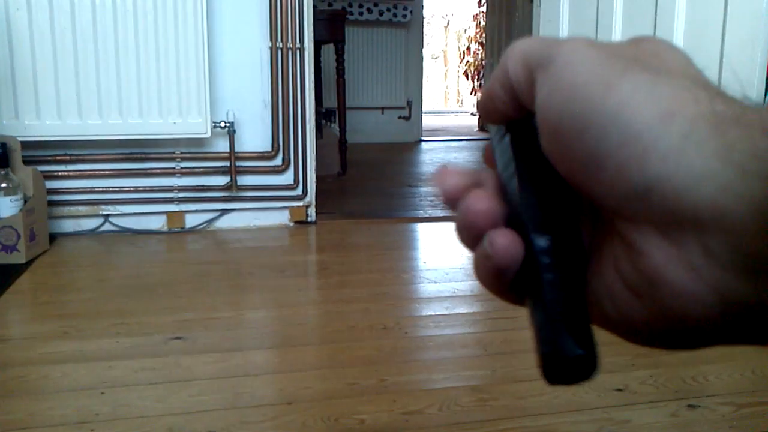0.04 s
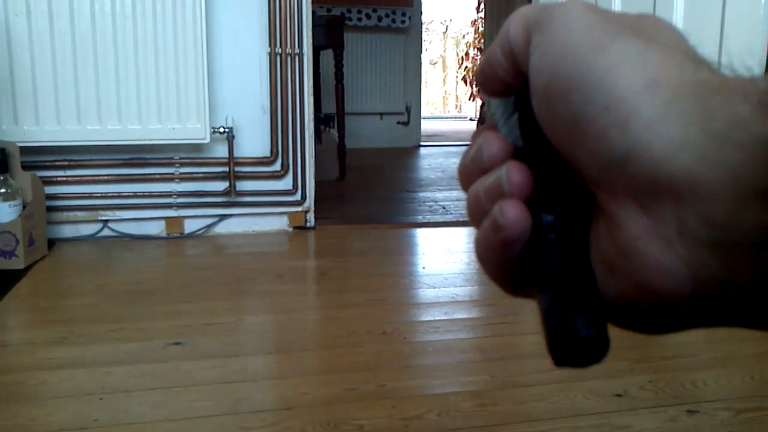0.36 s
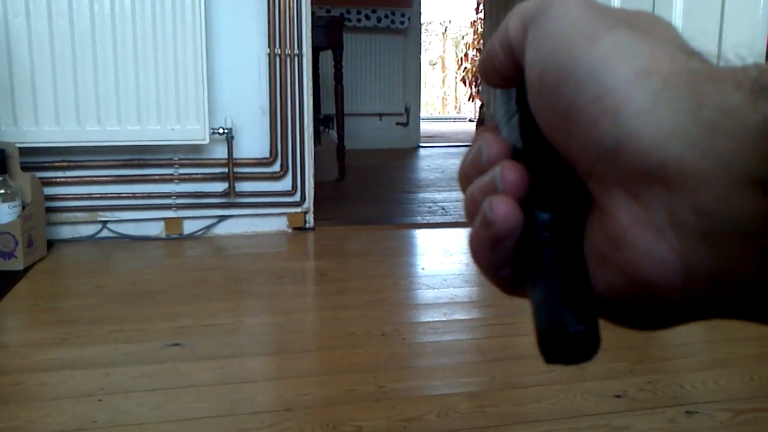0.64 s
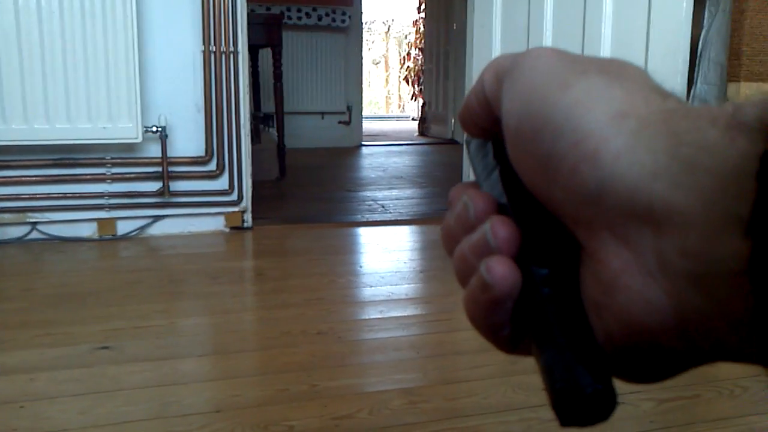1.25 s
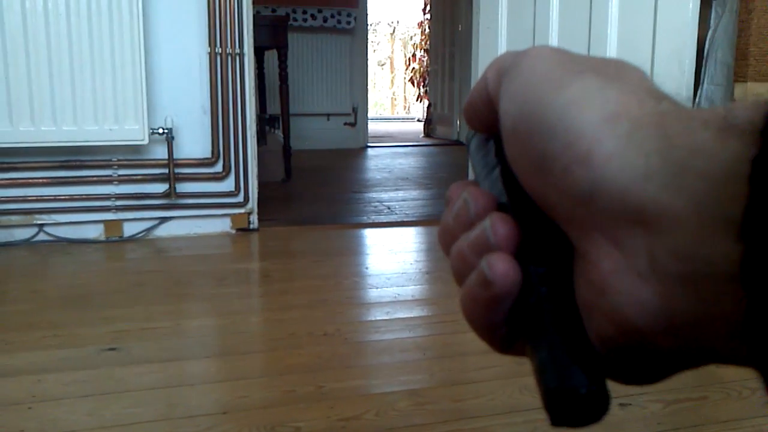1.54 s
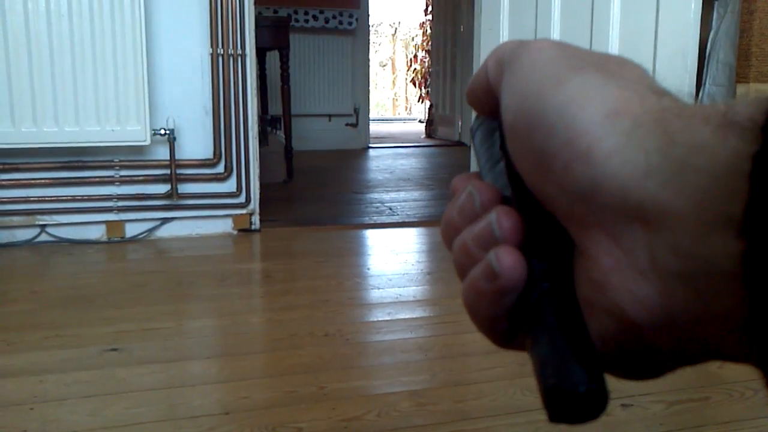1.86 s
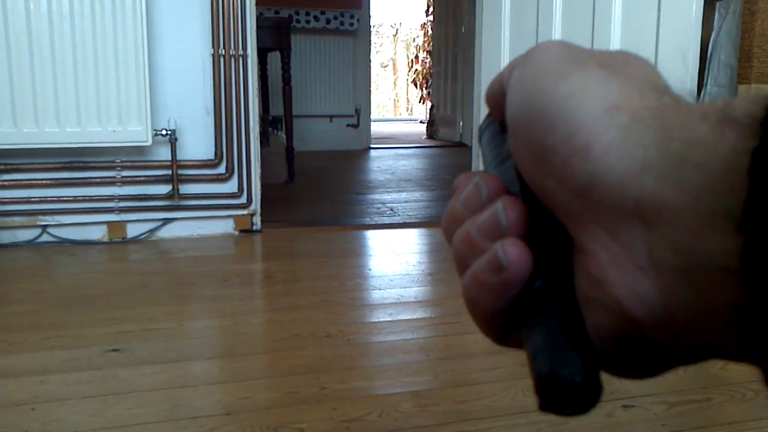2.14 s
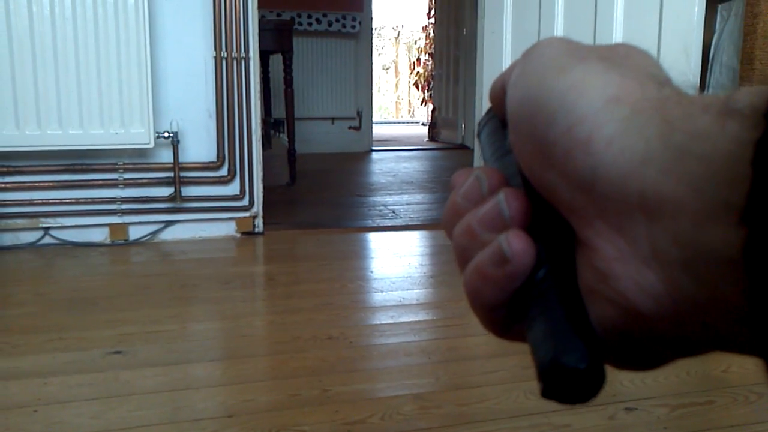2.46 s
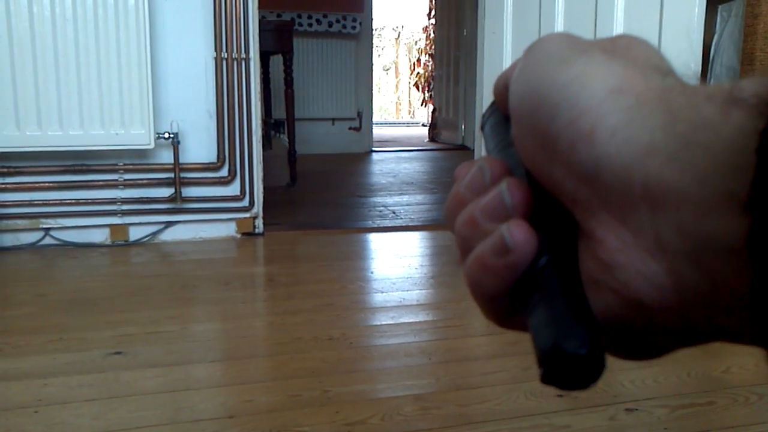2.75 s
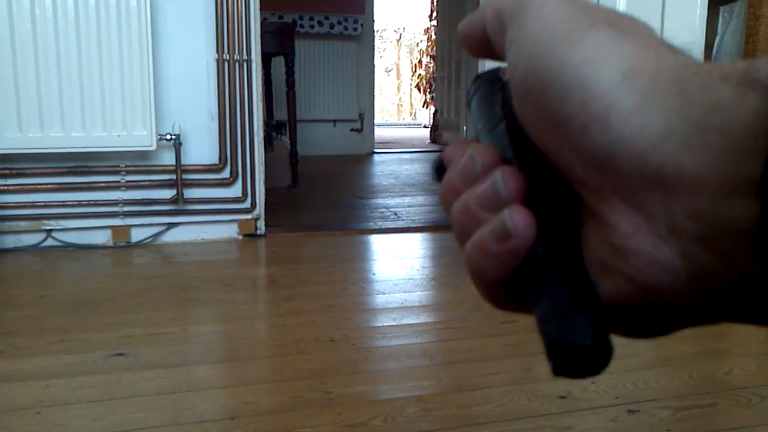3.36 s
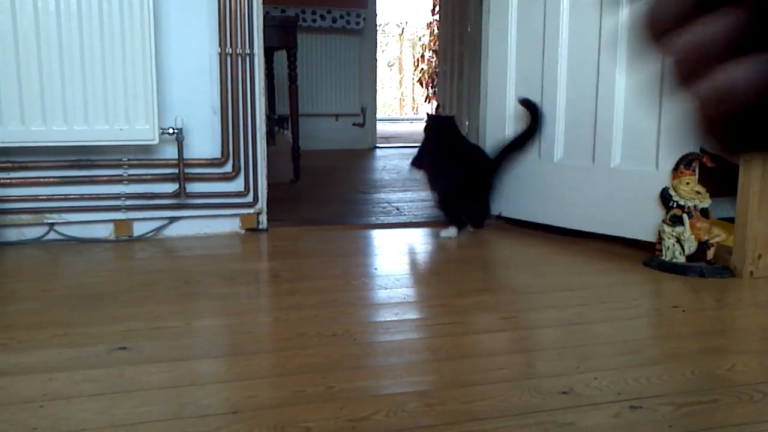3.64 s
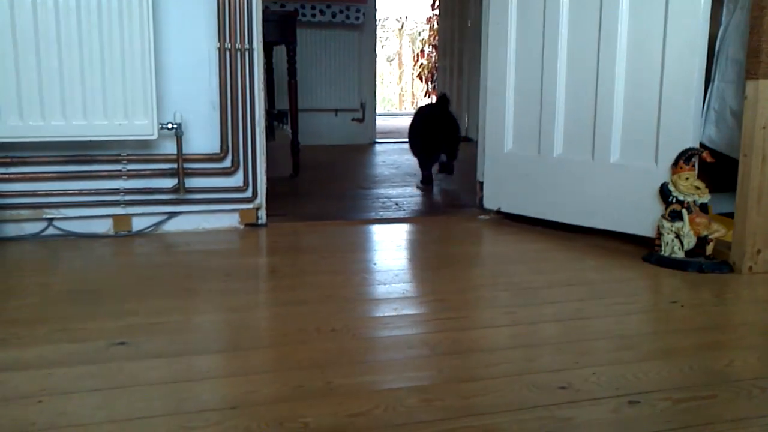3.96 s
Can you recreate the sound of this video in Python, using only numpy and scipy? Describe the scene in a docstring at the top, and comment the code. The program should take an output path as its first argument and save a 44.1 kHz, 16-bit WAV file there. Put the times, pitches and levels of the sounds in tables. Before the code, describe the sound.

One sudden pop from a small homemade gun, followed by a cat's claws scrabbling on wood.

```python
"""A room with a wooden floor. A small homemade gun pops close to a camera: air bursts out and rings
the barrel. The shot strikes and rebounds, cracking against something that rings briefly.
A cat bolts after it: claws scrabble and paws thump on the boards. Before the pop, a hand rubs
softly on the gun. Under it all lie room noise, a low hum and the camera's thin, wandering whine."""
import sys
import numpy as np
from scipy import signal
from scipy.fft import rfft, irfft, next_fast_len
from scipy.io import wavfile
from scipy.ndimage import map_coordinates

SR = 44100
rng = np.random.default_rng(int(sys.argv[2]) if len(sys.argv) > 2 else 0)


def log_audio(samples):
    """Write samples as a 16-bit WAV file to the path given in sys.argv[1]."""
    # one column per channel
    frames = np.atleast_2d(samples).T
    # limit to full scale, then quantise
    limited = np.clip(frames, -1, 1)
    pcm = np.round(limited * 32767).astype(np.int16)
    wavfile.write(sys.argv[1], SR, pcm)


N = 176400
T = np.arange(N) / SR
AGE = np.arange(SR // 2) / SR  # time since an event's onset [s]

# modes of the hollow body and barrel (frequency [Hz], level [dB], t60 [s])
GUN_MODES = [(143, -15, .07), (270, -4, .029), (640, 1.5, .019), (1160, -13, .035), (2970, -9, .032),
             (3700, 1, .014), (4270, -8, .02), (4770, 0, .016), (5170, -7, .02), (6105, -1, .023)]
# escaping air (frequency [Hz], level [dB])
PUFF_SPECTRUM = [(60, -28.5), (150, -11.5), (650, -5.5), (1000, -7), (2200, -9.5), (3800, -2.5), (6100, -2),
                 (7300, -10.5), (9000, -33.5)]


def gun():
    """Air leaks, then bursts out and rings the barrel; the ceiling throws the pop back."""
    pop_s, leak_lead_s, ceiling_delay_s = 2.9745, 0.0016, 0.0126
    leak_db, burst_db = -22.5, -19.5
    body, air = np.zeros(N), np.zeros(N)
    pop = amp(-13) * ringing(GUN_MODES) * envelope(rise_s=0.0016)
    add(body, pop_s, pop)
    add(body, pop_s + ceiling_delay_s, amp(-6) * pop)
    for s, db in [(pop_s - leak_lead_s, leak_db), (pop_s, burst_db)]:
        puff = noise(PUFF_SPECTRUM) * envelope(rise_s=0.0012, t60_s=0.028)
        add(air, s, amp(db) * puff)
    return bass_cut(in_room(body, tail_db=-11) + in_room(air, tail_db=0), edge_hz=117, order=4)


# the pop's sharp echo off the ceiling, then the shot's impact and rebounds (time [s], crack level [dB], ring
# level [dB])
CRACKS = [(2.9871, -23, -34), (2.9917, -28.5, -18.5), (3.0235, -42, -23.5), (3.044, -46.5, -24)]
# contact crack (frequency [Hz], level [dB])
CRACK_SPECTRUM = [(60, -26.5), (180, -11), (400, -5), (700, -11), (1200, 3), (2600, -5), (4200, -7),
                  (5800, 2.5), (7300, -19), (9000, -42)]
# modes of the struck object (frequency [Hz], level [dB], t60 [s])
TARGET_MODES = [(1680, -14, 0.033), (1828, -1.5, .055), (1908, -11.5, .08), (2020, -22, .04)]


def cracks():
    """Each row cracks and rings the object briefly: first the pop's sharp echo off the ceiling, then each
    contact of the shot."""
    out = np.zeros(N)
    for s, crack_db, ring_db in CRACKS:
        crack = noise(CRACK_SPECTRUM) * envelope(rise_s=0.00052, t60_s=0.034)
        add(out, s, amp(crack_db) * in_room(crack, tail_db=-11.5))
        ring = ringing(TARGET_MODES) * envelope(rise_s=0.0016)
        add(out, s, amp(ring_db) * in_room(ring, tail_db=-10))
    return out


# claws catching the boards (time [s], level [dB])
CLAW_CATCHES = [(3.436, -41.5), (3.5097, -40), (3.5131, -41.5), (3.522, -39.5), (3.538, -42.5),
                (3.549, -39), (3.561, -45), (3.5843, -38.5), (3.595, -46.5), (3.615, -38), (3.6228, -45),
                (3.641, -41.5), (3.671, -47), (3.686, -43.5), (3.8252, -41), (3.8441, -40.5),
                (3.879, -45.5), (3.9502, -40.5), (3.9607, -42), (3.971, -41.5), (3.9833, -49.5),
                (3.9922, -42.5)]
# claw on wood (frequency [Hz], level [dB])
CLAW_SPECTRUM = [(100, -16.5), (350, 0.5), (1200, -5), (1850, -11.5), (2800, -2.5), (4500, -1), (6300, 1.5),
                 (7200, -4), (8000, -28.5), (9000, -36.5)]
# skid between catches (time [s], level [dB])
SKID_LEVELS = [(3.3, -75.5), (3.39, -61.5), (3.505, -73), (3.53, -58), (3.61, -43.5), (3.67, -49.5),
               (3.74, -54), (3.81, -54.5), (3.86, -55.5), (3.94, -55.5), (3.97, -48.5), (4, -51)]


def claws():
    """Claws catch sharply on the boards over a dense patter of tiny slips."""
    slips_per_s, spread_db = 450, 4
    catches = np.zeros(N)
    for s, db in CLAW_CATCHES:
        click = noise(CLAW_SPECTRUM) * envelope(rise_s=0.00017, t60_s=0.027)
        add(catches, s, amp(db) * in_room(click, tail_db=1))
    slips = (rng.random(N) < slips_per_s / SR) * np.sign(rng.standard_normal(N))
    slips *= amp(spread_db * rng.random(N))
    skid = unit(in_room(coloured(slips, CLAW_SPECTRUM), tail_db=-1.5))
    return catches + skid * amp(over_time(SKID_LEVELS))


# paw landings (time [s], level [dB], board pitch [Hz])
PAW_LANDINGS = [(3.309, -48, 339), (3.323, -41, 231.6), (3.44, -45.5, 327), (3.534, -38.5, 284),
                (3.548, -43.5, 532), (3.591, -37.5, 290), (3.608, -51, 330), (3.662, -40, 122),
                (3.668, -42.5, 356), (3.695, -37.5, 117.5), (3.704, -41, 373), (3.728, -43.5, 148),
                (3.967, -71, 390)]
# dull slap of a pad (frequency [Hz], level [dB])
PAD_SPECTRUM = [(60, -20), (150, 1), (400, 5), (700, -6.5), (1250, -16.5), (2000, -17.5), (5000, -52)]


def paws():
    """Each soft landing booms the board briefly as the pad slaps it."""
    out = np.zeros(N)
    for s, db, hz in PAW_LANDINGS:
        board = np.sqrt(2) * np.sin(2 * np.pi * hz * AGE)
        pad = amp(-2.5) * noise(PAD_SPECTRUM)
        thump = (board + pad) * envelope(rise_s=0.0061, t60_s=0.081)
        add(out, s, amp(db) * in_room(thump, tail_db=-4.5))
    return out


# grip shifts (time [s], level [dB], half-width [s])
GRIP_SHIFTS = [(1.1, -68, 0.027), (1.189, -70, 0.034)]
# skin rubbing (frequency [Hz], level [dB])
SKIN_SPECTRUM = [(100, -10), (300, -2), (1200, -5), (2500, -13.5), (5000, -9), (8000, -35)]


def grip():
    """The hand rubs softly on the gun as it shifts."""
    return sum(amp(db) * noise(SKIN_SPECTRUM, N) * np.exp(-((T - s) / half_width_s) ** 2)
               for s, db, half_width_s in GRIP_SHIFTS)


# centre of the whine (time [s], frequency [Hz])
WHINE_PITCH = [(0, 5600), (.62, 5630), (.8, 6000), (.87, 5600), (1, 5800), (1.08, 5600), (1.23, 5580),
               (1.31, 5880), (1.39, 5560), (1.55, 5850), (1.63, 5560), (1.75, 5940), (1.83, 5650),
               (2.2, 5630), (2.33, 5780), (2.44, 5520), (2.62, 5950), (2.9, 5930)]


def camera_whine():
    """The camera whines: a narrow noise band that wanders in pitch and pulses fast."""
    fuzz_hz, pulse_hz, pulse_depth = 330, 56, 0.8
    phase = 2 * np.pi * np.cumsum(over_time(WHINE_PITCH)) / SR
    band = wobble(fuzz_hz) * np.sin(phase) + wobble(fuzz_hz) * np.cos(phase)
    pulsing = 1 + pulse_depth * np.tanh(2 * np.sin(2 * np.pi * pulse_hz * T))
    return amp(-74) * unit(band * pulsing)


# room noise and hiss (frequency [Hz], level [dB])
ROOM_NOISE_SPECTRUM = [(25, -43), (50, -25), (75, -12.5), (110, -9), (150, 4.5), (180, -3.5), (215, 1.5),
                       (300, -2.5), (400, -7.5), (520, -5), (800, -13.5), (2300, -20.5), (4900, -22),
                       (5900, -18), (6900, -19.5), (7500, -30), (8200, -43.5), (9000, -49)]


def room_tone():
    """Steady room noise and a low hum whose level wavers."""
    hum_hz, hum_db, waver_db = 83.4, -67.5, 1.4
    hum = np.sqrt(2) * np.sin(2 * np.pi * hum_hz * T) * amp(hum_db + waver_db * wobble(2.8))
    return hum + amp(-63.5) * noise(ROOM_NOISE_SPECTRUM, N)


# room decay (frequency [Hz], t60 [s])
ROOM_T60 = [(100, 0.27), (300, 0.38), (700, 0.42), (1800, 0.5), (3500, 0.42), (5800, 0.45), (9000, .3)]
# colour of the room's tail (frequency [Hz], level [dB])
TAIL_SPECTRUM = [(100, 5.5), (300, 0), (600, -3.5), (1200, 4), (3000, -2), (5500, -1), (9000, -2.5)]


def in_room(x, tail_db):
    """x plus a fresh diffuse tail, each band dying at its own rate."""
    delay_s, build_s = 0.003, 0.002
    hz, t, bands = signal.stft(rng.standard_normal(len(AGE)), SR, nperseg=256)
    bands *= fade(t, over_frequency(ROOM_T60, hz)[:, None])
    tail = signal.istft(bands, SR, nperseg=256)[1][:len(AGE)]
    tail = coloured(tail, TAIL_SPECTRUM) * np.clip((AGE - delay_s) / build_s, 0, 1)
    return x + amp(tail_db) * signal.fftconvolve(x, tail / np.linalg.norm(tail))[:len(x)]


def amp(db):
    """Decibels to gain."""
    return 10 ** (np.asarray(db) / 20)


def unit(x):
    """x at rms 1."""
    return x / np.sqrt(np.mean(x ** 2) + 1e-20)


def over_time(points):
    """(time [s], value) points read at every sample."""
    return np.interp(T, *np.transpose(points))


def over_frequency(points, hz):
    """(frequency [Hz], value) points read on a log axis."""
    knots_hz, values = np.transpose(points)
    return np.interp(np.log(hz + 1), np.log(knots_hz + 1), values)


def filtered(x, response):
    """x through a gain given as a function of frequency."""
    size = next_fast_len(len(x) + 8192)
    return irfft(rfft(x, size) * response(np.fft.rfftfreq(size, 1 / SR)), size)[:len(x)]


def coloured(x, spectrum):
    """x shaped by a spectrum table."""
    return filtered(x, lambda hz: amp(over_frequency(spectrum, hz)))


def bass_cut(x, edge_hz, order):
    """Steep high-pass."""
    return signal.sosfilt(signal.butter(order, edge_hz, "highpass", fs=SR, output="sos"), x)


def noise(spectrum, size=len(AGE)):
    """Coloured noise at rms 1."""
    return unit(coloured(rng.standard_normal(size), spectrum))


def wobble(knots_per_s):
    """Smooth random curve."""
    return map_coordinates(rng.standard_normal(8192), [T * knots_per_s], mode="wrap")


def fade(t, t60_s):
    """Exponential decay, 60 dB in t60_s."""
    return np.exp(-np.log(1000) * t / t60_s)


def envelope(rise_s, t60_s=np.inf):
    """Soft attack with optional decay."""
    return (1 - np.exp(-AGE / rise_s)) * fade(AGE, t60_s)


def ringing(modes):
    """Damped sines of a struck body, at random phases."""
    return sum(amp(db) * fade(AGE, t60_s) * np.sin(2 * np.pi * (hz * AGE + rng.random()))
               for hz, db, t60_s in modes)


def add(track, s, sound):
    """Mix a sound into the track at time s."""
    part = track[round(s * SR):][:len(sound)]
    part += sound[:len(part)]


def scene():
    """All sources at one microphone."""
    return (gun() + cracks() + claws() + paws() + grip() + camera_whine() + room_tone())[None]


def record(dry):
    """The camera drops the deep bass and rolls off steeply at its band limit."""
    top_hz = 8900
    top_cut = lambda hz: 1 / np.sqrt(1 + (hz / top_hz) ** 120)
    return np.array([filtered(bass_cut(x, edge_hz=63, order=5), top_cut) for x in dry])


dry = scene()
out = record(dry)
log_audio(out)
```